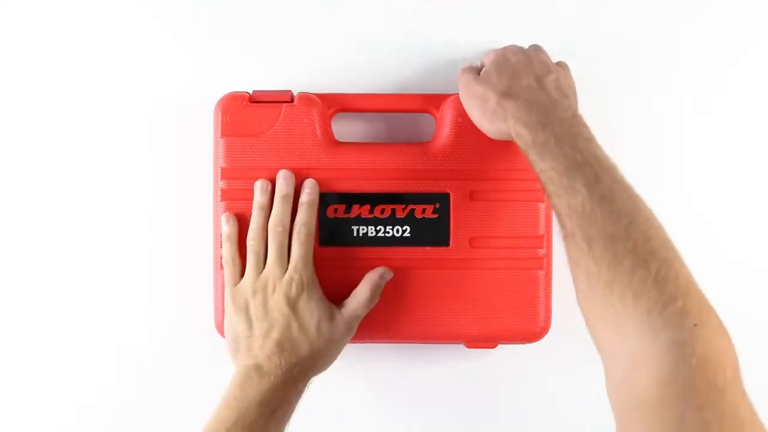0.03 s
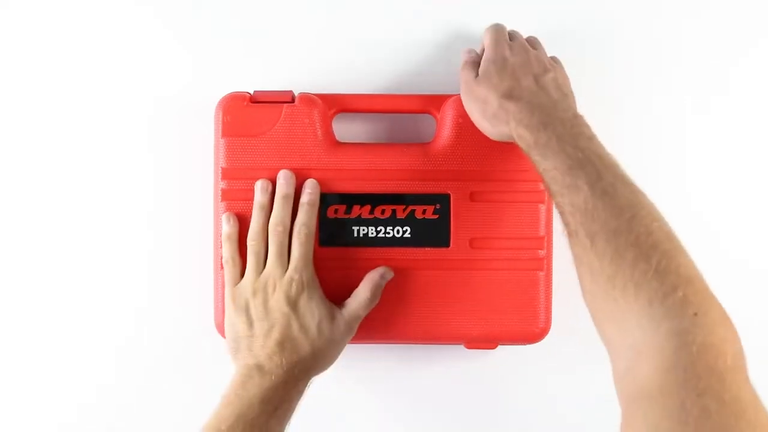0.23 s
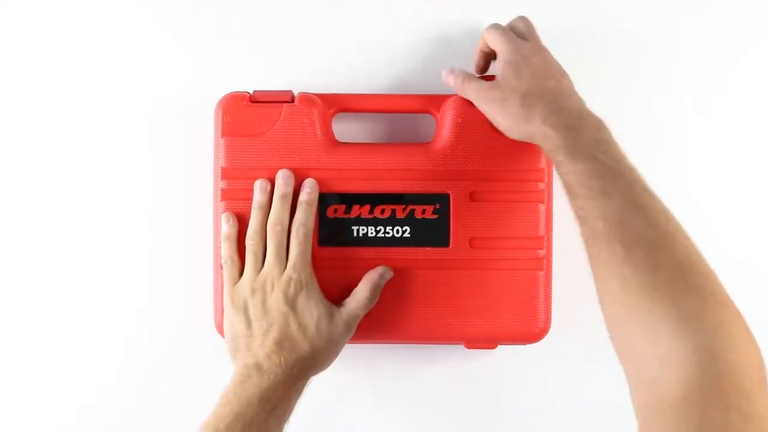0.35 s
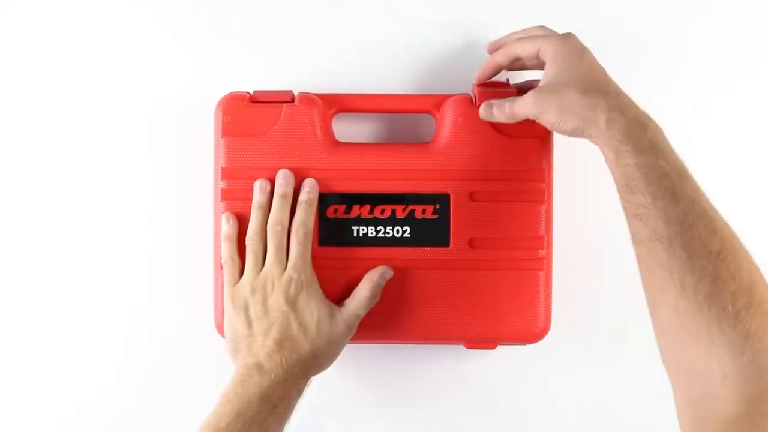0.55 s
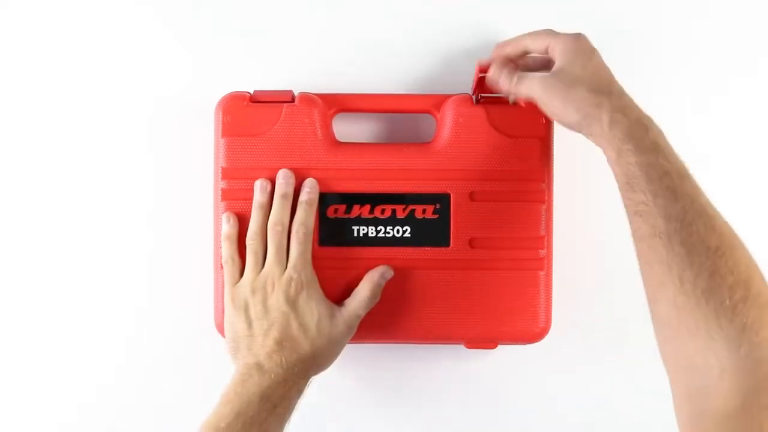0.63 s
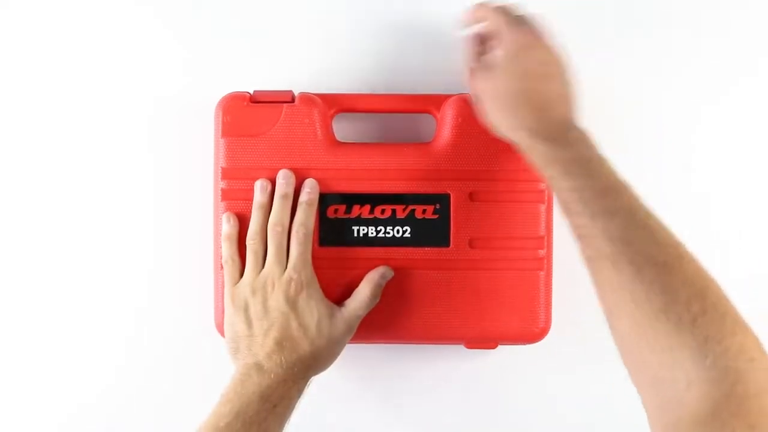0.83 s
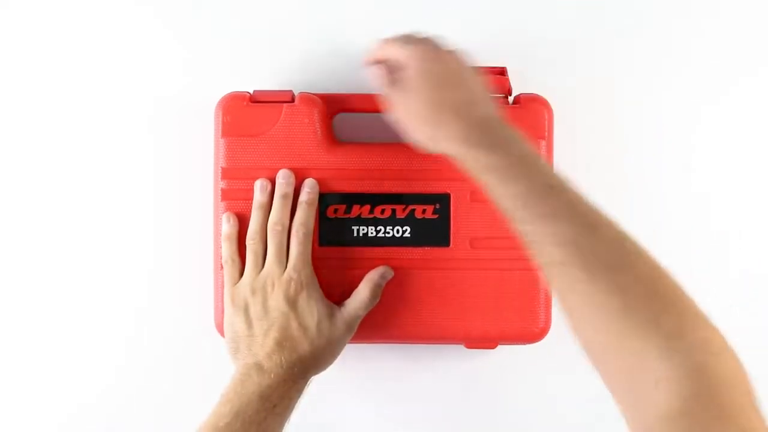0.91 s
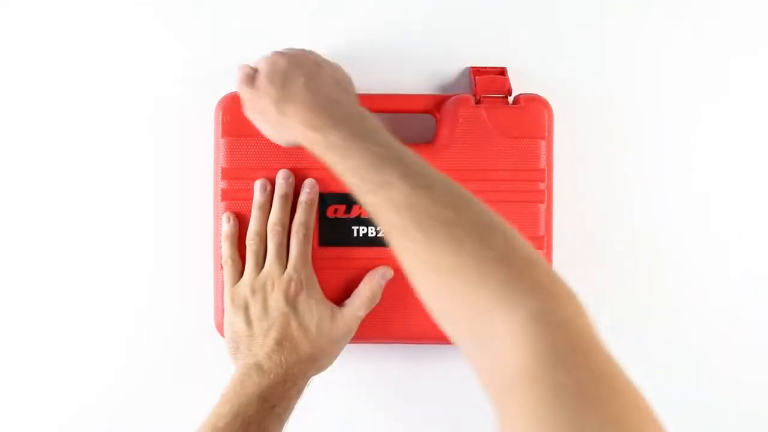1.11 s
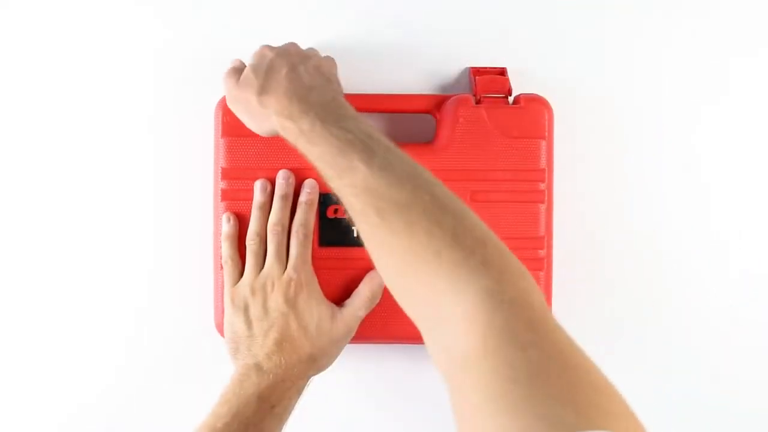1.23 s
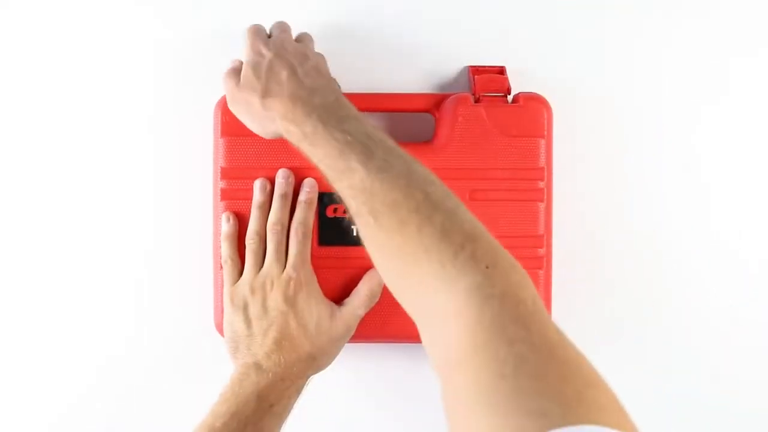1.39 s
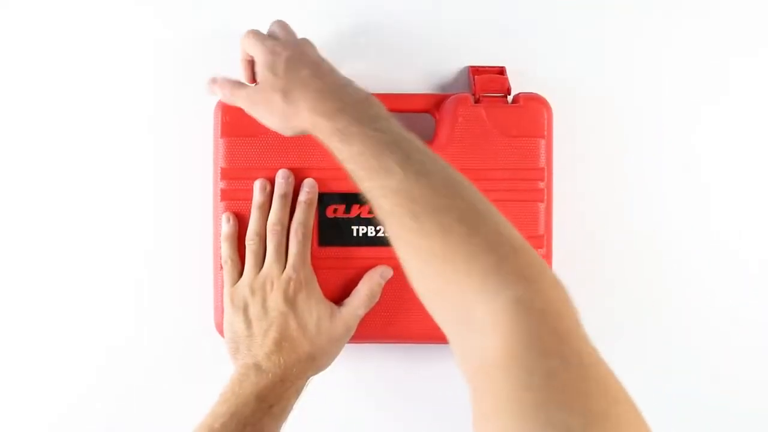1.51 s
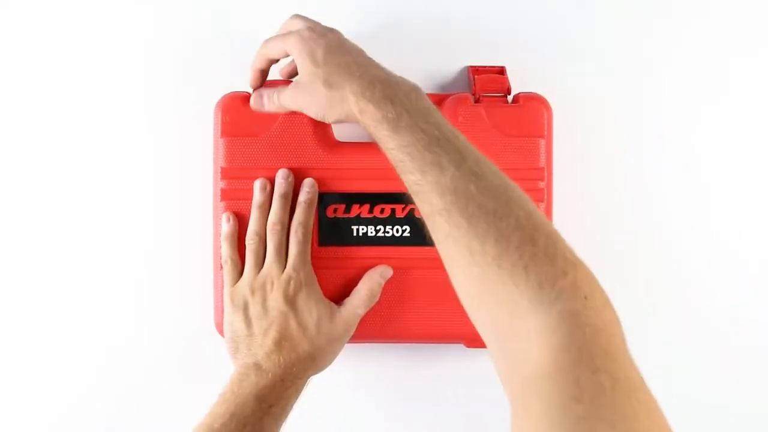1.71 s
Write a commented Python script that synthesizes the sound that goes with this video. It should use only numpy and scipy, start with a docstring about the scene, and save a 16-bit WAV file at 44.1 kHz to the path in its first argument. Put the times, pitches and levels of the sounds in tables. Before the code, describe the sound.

Two hollow plastic latch pops on a carrying case, each followed by flap ticks, in a bare room

```python
"""Two latches of a hollow plastic case pop open on a table, each a quick run of jolts with a table thump.
The loose latch flap ticks and slaps after each pop; a grainy rustle of straining fingers swells into each pop.
Case and flap are banks of decaying sine modes plus a crack of coloured noise.
Every blow leaves a long noise-built tail of a bare, echoing room, over a faint low room tone."""
import sys
import numpy as np
from scipy import signal
from scipy.fft import rfft, irfft, next_fast_len
from scipy.io import wavfile

SR = 44100
rng = np.random.default_rng(int(sys.argv[2]) if len(sys.argv) > 2 else 0)


def wav_out(sig):
    """Save sig, one row per channel (or a flat mono array), as 16-bit PCM at SR to the path in sys.argv[1]."""
    wavfile.write(sys.argv[1], SR, np.round(np.clip(np.atleast_2d(sig).T, -1, 1) * 32767).astype(np.int16))


N = 77175

# Jolts through the case as a latch tears loose:
# (time [s], level [dB], treble tilt [dB], bass tilt [dB], left over right [dB])
LATCH_JOLTS = [(.222, -15.5, 10, -19, -5.5), (0.2264, -23, 9.5, 8.5, 9), (0.2295, -3.5, -6.5, 3.5, 0.5),
               (0.2363, -9.5, -1, 3.5, -3.5), (.240, -8, 4, 0, 3.5), (0.243, -6.5, -1, -1.5, -9),
               (0.248, -9.5, -16.5, 1, -17.5), (0.251, -6, -7.5, -9, -4), (0.2566, -9, -12.5, 2, 1.5),
               (0.261, -17.5, -13, 3.5, -8), (0.2697, -19, 2, -8, -3.5), (0.2721, -14.5, -4.5, -3.5, -10),
               (.284, -13, -5, -1.5, -5.5), (1.412, -31.5, 5.5, -16, -12), (1.4178, -18.5, 4.5, -5, -18.5),
               (1.421, -16.5, 10, -27, -13.5), (1.4257, -10, -1, -1, -5.5), (1.4283, -6.5, 2, -4.5, 5.5),
               (1.433, -6, -3, 0.5, 4.5), (1.439, -12, 2.5, 3.5, -7), (1.441, -21, 5, 13, 2.5),
               (1.450, -20, 7, 3, -11.5), (1.468, -12, -4, -1.5, 4), (1.477, -18, -13.5, 0, -4),
               (1.526, -22.5, 1.5, 7, -3)]
# Ringing modes of the hollow case: (frequency [Hz], relative level [dB], t60 [s])
CASE_MODES = [(133, -23, 0.042), (263.5, -8, 0.053), (323.2, -5.5, 0.049), (403.1, -0.5, .06),
              (503.1, -8.5, .05), (739, -7.5, 0.029), (933, -6.5, 0.028), (1143.5, -0.5, 0.023),
              (1300, -9, 0.038), (1514, -2.5, 0.024), (1737, -15.5, 0.13), (2051, -5, 0.014),
              (2490, -7, 0.023), (2687, -5, 0.013), (3090, -39, 0.012)]
# Colour of the case's noise crack: (frequency [Hz], relative level [dB])
CASE_CRACK_COLOUR = [(300, 4), (1500, -7.5), (2600, -7), (3400, -10.5), (4200, -17), (5000, -21.5),
                     (7000, -22.5), (10000, -26.5), (16000, -47)]
# Blows of the latch flap, plus the table's bounce just after the snap (0.8503 s) through the same modes: #
# (time [s], level [dB], favoured frequency [Hz], # distance at which modes are 6 dB down [octaves], crack level
# [dB], left over right [dB])
TICKS = [(0.5992, -10.5, 1600, 0.67, -13, -3), (.602, -9.5, 520, 0.31, -25, -3),
         (0.8474, -1, 3000, 2.58, -9.5, 3), (0.8503, -7.5, 1300, 1.2, -13.5, -2),
         (1.6608, -8, 2760, 0.43, -19.5, -6), (1.726, -9, 2030, 0.44, -16, -10),
         (1.7321, -10.5, 950, 0.96, -16, 3.5)]
# Ringing modes of the latch flap: (frequency [Hz], relative level [dB], t60 [s])
FLAP_MODES = [(520, -9.5, .045), (680, -15, 0.069), (880, -11, 0.018), (1110, -9, 0.021), (1348, -7, .03),
              (1469, -9, 0.021), (2166, -8.5, 0.024), (2318, -11, 0.016), (3032, -5, .015),
              (3840, -12.5, 0.011), (6130, 0.5, .005), (7130, 11.5, 0.0032), (8640, 6.5, 0.0033),
              (9980, -2, 0.0035), (12200, -6, 0.0023)]
# Colour of the flap's noise crack: (frequency [Hz], relative level [dB])
FLAP_CRACK_COLOUR = [(400, -41.5), (1500, -4.5), (3200, -1), (4300, -10.5), (5200, -10), (7000, -5),
                     (11000, -18), (16000, -25)]
# Fingers straining the latch: (start [s], end [s], level at start [dB], level at end [dB])
STRAIN_SWELLS = [(0.182, 0.245, -62.5, -39), (1.36, 1.43, -64.5, -44.5)]
# Colour of the straining rustle: (frequency [Hz], relative level [dB])
RUSTLE_COLOUR = [(200, -7.5), (900, -10), (2500, -16.5), (4000, -30.5), (9000, -33.5), (16000, -56)]
# Decay of the late room tail: (frequency [Hz], t60 [s])
ROOM_DECAY = [(60, 0.81), (200, 1.17), (500, 1.19), (1500, 1.275), (4000, 1.18), (8000, 1.02), (15000, 1.2)]
# Colour of the room's early and late sound: (frequency [Hz], relative level [dB])
ROOM_TINT = [(60, 2.5), (130, -1.5), (250, -5), (400, -5), (700, 2), (1500, -1), (3000, -0.5), (4100, 3),
             (4900, -1.5), (6000, 2.5), (7000, -1.5), (10000, -1), (15000, -1.5)]
# Stereo width of the room before the bass is narrowed: (frequency [Hz], left-right correlation [-1 to 1])
ROOM_LIKENESS = [(60, .997), (250, .985), (500, .88), (1000, .45), (2500, .05), (5000, -.15), (15000, -.1)]
# Colour of the room tone: (frequency [Hz], relative level [dB])
TONE_COLOUR = [(15, -64), (25, -26.5), (309, -16), (354, -8), (416, -15.5), (463, -16), (695, -23.5),
               (775, -22.5), (4870, -47), (16000, -53)]
# Stereo width of the room tone before the bass is narrowed: (frequency [Hz], left-right correlation [-1 to 1])
TONE_LIKENESS = [(60, 0.61), (380, 0.64), (2380, 0.099), (15000, 0.07)]

SECOND_POP_S = 1  # jolts after this time belong to the second pop
CASE_CRACK_DB, CASE_CRACK_T60_S = -6, 0.02515
CASE_ATTACK_S, CASE_SCATTER_DB, CASE_FLOOR_HZ = 0.000618, 1.5, 184
BASS_TILT_HZ, TREBLE_TILT_HZ = 600, 2600
THUMP_HZ, THUMP_DB, THUMP_T60_S, THUMP_ATTACK_S = 60.3, -25.5, .12, .006
FLAP_CRACK_T60_S = .015
FLAP_ATTACK_S, FLAP_SCATTER_DB, FLAP_FLOOR_HZ = 0.00058, 0.9, 436
GRAIN_DB, GRAIN_S = 3, 0.0026  # spread and spacing of the rustle's grains
ROOM_DELAY_S, ROOM_DB, EARLY_DB, EARLY_T60_S = .004, -5, -9.5, .15
BLUR_OCTAVES = 0.13  # the late room evens out narrower peaks and dips
CASE_WASH_DB, WASH_HZ = 5, 5130  # the case sends more treble round the room than the flap
TONE_DB = -59
NARROW_HZ, TOP_HZ = 370, 16000  # the pair hears bass alike, and nothing from the top limit up


def pop(jolts):
    """Each jolt shakes the hollow case with its own treble and bass; the table thumps on the second jolt."""
    out = np.zeros((2, N + SR))
    for s, db, treble_db, bass_db, pan_db in jolts:
        def weight_db(hz):
            treble = treble_db / (1 + (TREBLE_TILT_HZ / hz) ** 4)
            bass = bass_db / (1 + (hz / BASS_TILT_HZ) ** 4)
            return treble + bass

        signs = rng.choice([-1, 1], len(CASE_MODES))
        jolt = strike(CASE_MODES, weight_db, CASE_SCATTER_DB, signs, CASE_CRACK_COLOUR,
                      CASE_CRACK_DB + treble_db, CASE_CRACK_T60_S, CASE_ATTACK_S, CASE_FLOOR_HZ)
        add(out, s, amp(db) * jolt, pan_db)
    add(out, jolts[1][0], thump(), 0)
    return out[:, :N]


def thump():
    """The table under the case gives one low, soft-edged, dying sine."""
    t = np.arange(SR // 2) / SR
    decay = amp(THUMP_DB - 60 * t / THUMP_T60_S)
    return decay * np.sin(2 * np.pi * THUMP_HZ * t) * (1 - np.exp(-t / THUMP_ATTACK_S))


def tick(s, db, centre_hz, octaves, crack_db, pan_db):
    """Where the flap lands decides which of its modes sound: those near the favoured frequency."""
    out = np.zeros((2, N + SR))
    weight_db = lambda hz: -6 * (np.log2(hz / centre_hz) / octaves) ** 2
    # the crack leans the same way, half as strongly
    crack = [(hz, level + max(weight_db(hz), -30) / 2) for hz, level in FLAP_CRACK_COLOUR]
    signs = (-1) ** np.arange(len(FLAP_MODES))
    blow = strike(FLAP_MODES, weight_db, FLAP_SCATTER_DB, signs, crack, crack_db,
                  FLAP_CRACK_T60_S, FLAP_ATTACK_S, FLAP_FLOOR_HZ)
    add(out, s, amp(db) * blow, pan_db)
    return out[:, :N]


def strike(modes, weight_db, scatter_db, signs, crack, crack_db, crack_t60, attack_s, floor_hz):
    """One blow: every mode rings anew, a burst of noise cracks, and little bass is radiated."""
    t = np.arange(SR // 4) / SR
    hz, db, t60 = np.transpose(modes)[:, :, None]
    scatter = scatter_db * rng.standard_normal(hz.shape)
    level = amp(db + weight_db(hz) + scatter - 60 * t / t60)
    ring = np.sum(signs[:, None] * level * np.sin(2 * np.pi * hz * t), axis=0) / 2
    burst = amp(crack_db - 60 * t / crack_t60) * noise(len(t), crack)
    blow = (ring + burst) * (1 - np.exp(-t / attack_s))
    return signal.sosfilt(signal.butter(2, floor_hz, 'high', fs=SR, output='sos'), blow)


def strain():
    """Fingers strain the latch: a grainy noise rustle swells into each pop."""
    t, level = np.arange(N) / SR, np.zeros(N)
    for start, end, start_db, end_db in STRAIN_SWELLS:
        active = (t > start) * (t < end)
        level += active * amp(np.interp(t, [start, end], [start_db, end_db]))
    knots = np.arange(0, N / SR + 1, GRAIN_S)
    grain_db = GRAIN_DB * np.interp(t, knots, rng.standard_normal(len(knots)))
    return level * amp(grain_db) * noise(N, RUSTLE_COLOUR)


def room(x, treble_db):
    """Quick early walls, then a long even wash, each frequency dying at its own speed."""
    x = np.pad(x.mean(axis=0), (round(ROOM_DELAY_S * SR), 0))[:N]

    # shape noise in time and frequency into an early and a late tail
    hz, t, z = signal.stft(rng.standard_normal((2, 2, N)), SR, nperseg=256)
    tint_db = along(ROOM_TINT, hz)[:, None]
    late_fall = 60 * t / along(ROOM_DECAY, hz)[:, None]
    late_gain = amp(ROOM_DB + tint_db - late_fall) / np.sqrt(SR / 10)
    early_gain = amp(EARLY_DB + tint_db - 60 * t / EARLY_T60_S) / np.sqrt(SR / 100)
    tails = signal.istft(z * np.array([early_gain, late_gain])[:, None], SR, nperseg=256)[1]
    early, late = [spread(tail[:, :N], ROOM_LIKENESS) for tail in tails]

    # colour the wash by the blows' blurred power spectrum
    total, bins = np.cumsum(abs(rfft(x)) ** 2), np.arange(N // 2 + 1)
    low, high = bins / 2 ** BLUR_OCTAVES - 2, bins * 2 ** BLUR_OCTAVES + 2
    power = (np.interp(high, bins, total) - np.interp(low, bins, total)) / (high - low)
    treble_gain = amp(treble_db / (1 + (WASH_HZ * N / SR / (bins + 1)) ** 4))
    wash = irfft(rfft(late) * np.sqrt(abs(power)) * treble_gain, N)

    # the wash starts at the blows' centre of energy
    middle = round(np.sum(np.arange(N) * x ** 2) / np.sum(x ** 2))
    walls = signal.fftconvolve(x[None], early, axes=1)[:, :N]
    return walls + np.pad(wash, ((0, 0), (middle, 0)))[:, :N]


def room_tone():
    """A faint, steady, mostly low noise, its left-right likeness set by frequency."""
    return amp(TONE_DB) * spread(noise((2, N), TONE_COLOUR), TONE_LIKENESS)


def amp(db):
    """Decibels to gain."""
    return 10 ** (np.asarray(db) / 20)


def along(points, hz):
    """Reads (frequency, value) points along a log frequency axis."""
    f, v = np.transpose(points)
    return np.interp(np.log(hz + 1), np.log(f + 1), v)


def filtered(x, response):
    """Applies a gain given as a function of frequency."""
    m = next_fast_len(x.shape[-1] + 8192)
    spectrum = rfft(x, m) * response(np.fft.rfftfreq(m, 1 / SR))
    return irfft(spectrum, m)[..., :x.shape[-1]]


def noise(size, colour):
    """Coloured noise of rms 1."""
    x = filtered(rng.standard_normal(size), lambda hz: amp(along(colour, hz)))
    return x / np.sqrt(np.mean(x ** 2))


def spread(pair, alike):
    """Mixes two unrelated signals to a left-right likeness."""
    def mid_side_gains(hz):
        turn = np.arccos(np.clip(along(alike, hz), -1, 1)) / 2
        return np.array([np.cos(turn), np.sin(turn)])

    mid, side = filtered(pair, mid_side_gains)
    return np.array([mid + side, mid - side])


def add(out, s, sound, pan_db):
    """Places a sound at a time and a side."""
    start = round(s * SR)
    out[:, start:start + len(sound)] += sound * amp([[pan_db / 2], [-pan_db / 2]])


def scene():
    """Case and flap in the room, with the straining fingers, over the room tone."""
    pops = [pop([j for j in LATCH_JOLTS if (j[0] > SECOND_POP_S) == later]) for later in (False, True)]
    ticks = [tick(*row) for row in TICKS]
    case = sum(x + room(x, CASE_WASH_DB) for x in pops)
    flap = sum(x + room(x, 0) for x in ticks)
    return case + flap + strain() + room_tone()


def record(dry):
    """A close pair: bass near mono, nothing above the band limit."""
    def mid_side_gains(hz):
        in_band = hz < TOP_HZ
        return np.array([in_band, in_band * hz ** 2 / (hz ** 2 + NARROW_HZ ** 2)])

    mid, side = filtered(np.array([dry[0] + dry[1], dry[0] - dry[1]]) / 2, mid_side_gains)
    return np.array([mid + side, mid - side])


dry = scene()
out = record(dry)
wav_out(out)
```